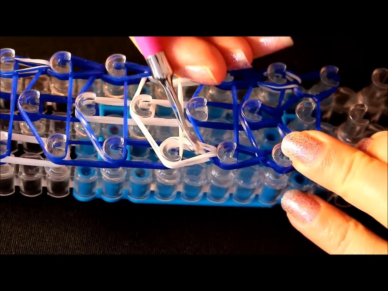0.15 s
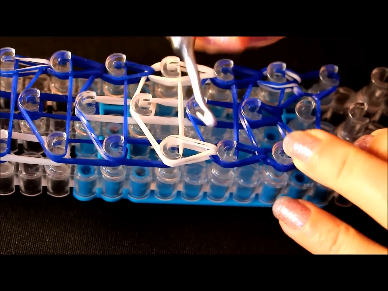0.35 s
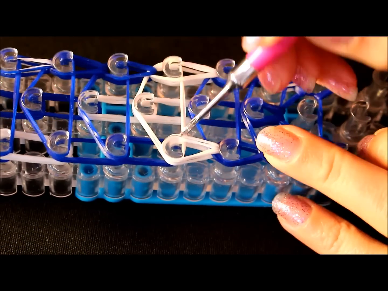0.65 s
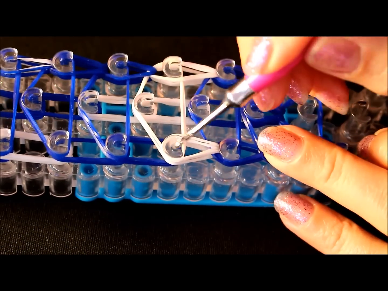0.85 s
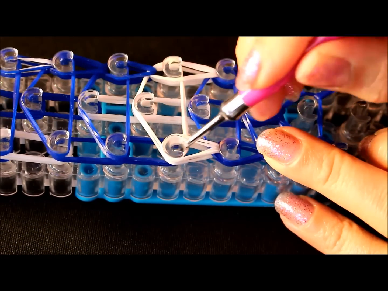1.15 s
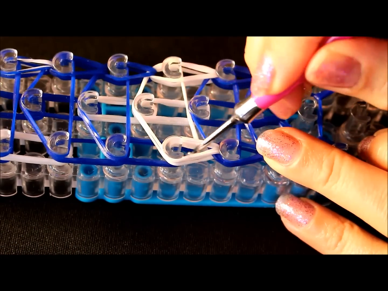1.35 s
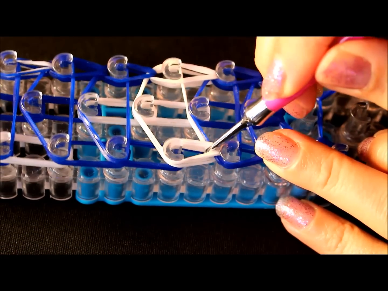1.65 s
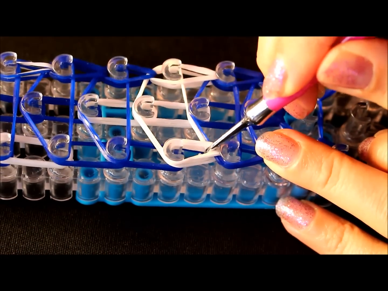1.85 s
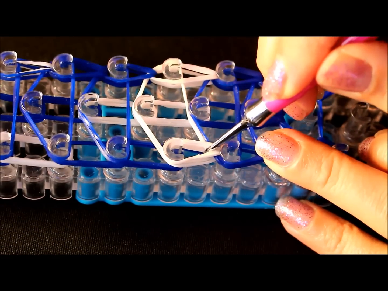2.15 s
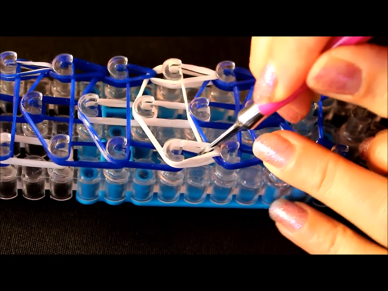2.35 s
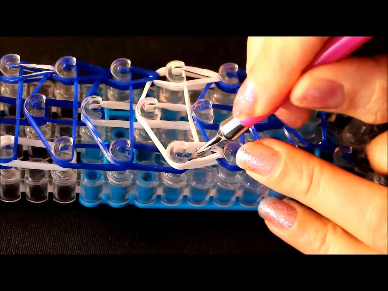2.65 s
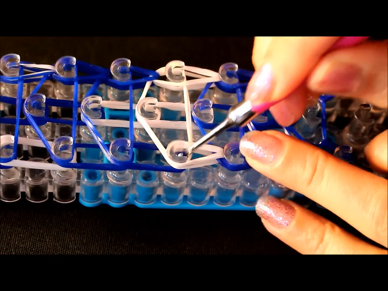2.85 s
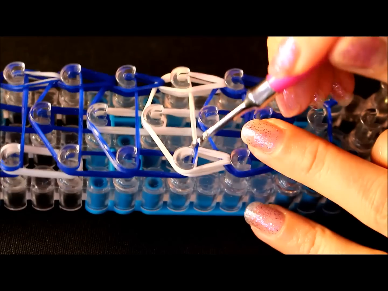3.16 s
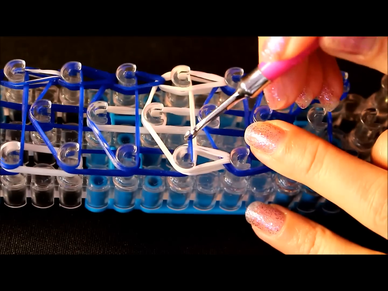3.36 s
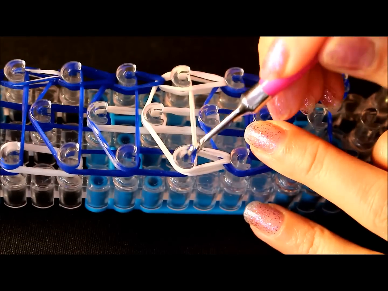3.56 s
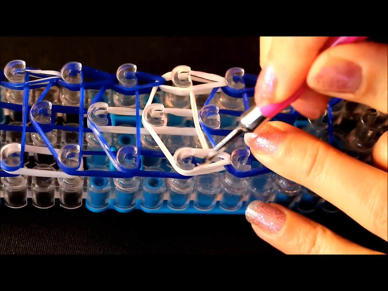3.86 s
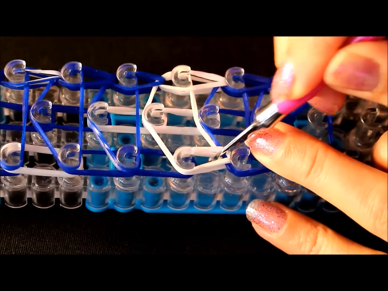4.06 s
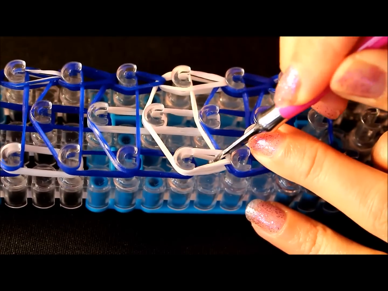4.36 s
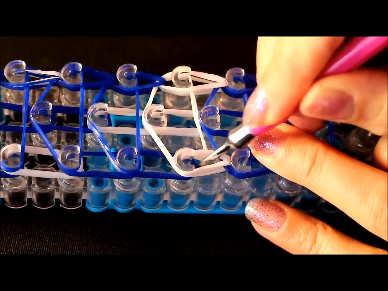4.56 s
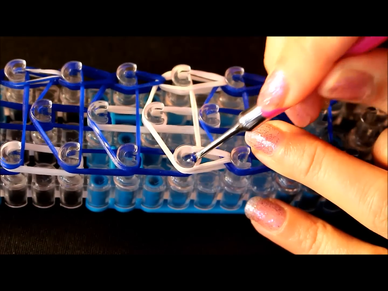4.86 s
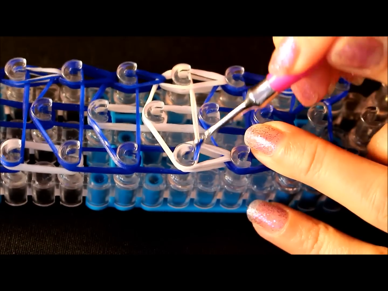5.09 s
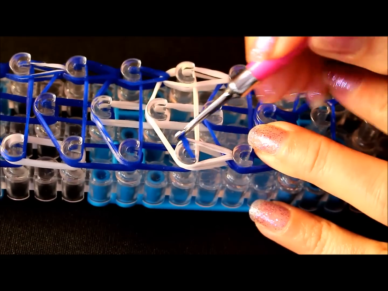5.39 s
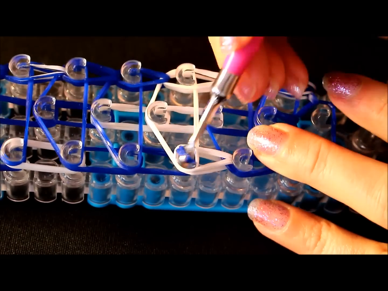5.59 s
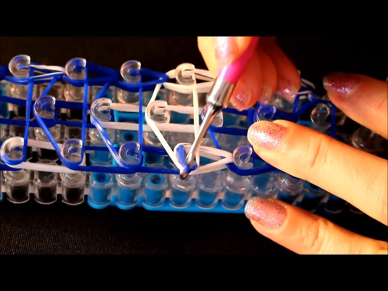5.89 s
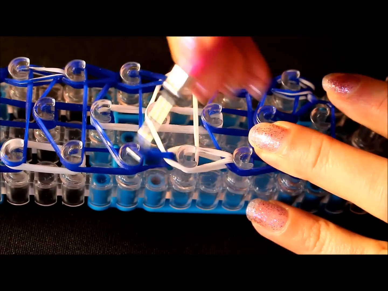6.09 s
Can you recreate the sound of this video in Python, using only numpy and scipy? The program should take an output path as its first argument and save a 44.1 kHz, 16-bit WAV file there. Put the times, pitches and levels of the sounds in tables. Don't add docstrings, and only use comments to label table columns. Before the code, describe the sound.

A steel hook taps and clicks on a plastic loom, rubber bands snapping hard twice, with soft rubbing and faint hiss indoors.

```python
import sys
import numpy as np
from scipy import signal
from scipy.fft import rfft, irfft
from scipy.io import wavfile
from scipy.ndimage import uniform_filter1d

SR = 44100
rng = np.random.default_rng(int(sys.argv[2]) if len(sys.argv) > 2 else 0)


def gain_from_decibels(decibels):
    exponent = np.asarray(decibels, float) / 20
    return 10 ** exponent


def store_wav(level_fs):
    pcm = np.round(np.clip(np.atleast_2d(level_fs), -1, 1) * 32767)
    wavfile.write(sys.argv[1], SR, pcm.T.astype(np.int16))


N = 274743
T = np.arange(N) / SR
SIDES = np.array([[1], [-1]])


def level(x, rms_db):
    return x * gain_from_decibels(rms_db) / np.sqrt(np.mean(x ** 2))


def add(track, start_s, sound):
    i = int(start_s * SR)
    track[i:i + len(sound)] += sound[:N - i]


def decay(t, t60_s):
    return np.exp(-np.log(1000) * t / t60_s)


def shaped(points, size=N):
    top_hz = 15780
    hz, db = np.transpose(points)
    f = np.maximum(np.arange(size // 2 + 1) * SR / size, 1)
    gain = gain_from_decibels(np.interp(np.log(f), np.log(hz), db)) * (f < top_hz)
    return irfft(rfft(rng.standard_normal(size)) * gain, size)


def walk(rate_hz):
    k = int(SR / rate_hz)
    return uniform_filter1d(np.repeat(rng.standard_normal(N // k + 1), k), k)[:N]


def ring(hz, t60_s, db, rise_s, size=int(0.12 * SR)):
    t = T[:size]
    lag_s = 0.0021 * np.minimum(1000 / hz, 1.1)[:, None] ** 2
    swell = (1 - np.exp(-t / (rise_s + lag_s))) ** 2
    phase = 2 * np.pi * (hz[:, None] * t + rng.random((len(hz), 1)))
    swing = (gain_from_decibels(db) / t60_s)[:, None]
    modes = swing * swell * decay(t, t60_s[:, None]) * np.sin(phase)
    return modes.sum(axis=0) / np.sqrt(np.sum(modes.max(axis=1) ** 2))


def blow(hz, t60_s, db, rise_s, crack_db=0):
    crack_fade_db, crack_t60_s = -4.5, 0.014
    rattle_db, rattle_t60_s = -16.5, 0.074
    modes = 1.027 * ring(hz, t60_s, db, rise_s)
    t = T[:len(modes)]
    even_db = uniform_filter1d(db, size=3)
    low_end, high_end = (hz[0] / 2, db[0] - 5.5), (hz[-1] * 0.95, db[-1] - 9)
    crack = level(shaped([low_end] + list(zip(hz, even_db)) + [high_end], size=len(t)), crack_db)
    swell = (1 - np.exp(-t / (rise_s + 0.00043))) ** 2
    fade = gain_from_decibels(crack_fade_db - 60 * t / crack_t60_s) + gain_from_decibels(rattle_db - 60 * t / rattle_t60_s)
    return modes + crack * swell * fade


# pitch_hz, level_db [rms]
HUM_PARTIALS = [(48.4, -68), (96.9, -65.5), (150.7, -70), (199.2, -71), (231.5, -80), (398.4, -80)]


def hum():
    mono = np.zeros(N)
    for pitch_hz, level_db in HUM_PARTIALS:
        wavering_db = level_db + 2.5 + 2.5 * walk(7.2)
        wavering_hz = pitch_hz * (1 + 0.01824 * walk(7.2))
        mono += gain_from_decibels(wavering_db) * np.sin(2 * np.pi * np.cumsum(wavering_hz) / SR)
    return mono * (1 + 0.033 * SIDES)


# freq_hz, density_db [per Hz]
HISS_MID_SPECTRUM = [(15, -38), (25, -21), (53, -4), (199, -3.5), (342, -7.5), (413, -5.5), (670, -8.5),
                     (977, -10.5), (1250, -11), (1680, -12), (3970, -14), (12000, -23.5), (15700, -29.5)]
# freq_hz, density_db [per Hz]
HISS_SIDE_SPECTRUM = [(15, -34), (25, -21), (91, -3.5), (210, -2.5), (370, -3.5), (670, -5.5), (831, -7),
                      (1390, -8.5), (5790, -16.5), (12000, -25.5), (15700, -31.5)]


def hiss():
    mid = level(shaped(HISS_MID_SPECTRUM), -59)
    side = level(shaped(HISS_SIDE_SPECTRUM), -55.5)
    return mid + SIDES * side


# centre_hz, t60_s, level_db
ROOM_BANDS = [(341, 0.33, -18.5), (1030, 0.27, -14), (3650, 0.24, -18.5), (9000, 0.16, -10.5)]


def room(x):
    gap_s, shared = 0.0046, 0.73
    t, tail = T[:SR // 3], 0
    for hz, t60_s, db in ROOM_BANDS:
        points = [(hz / 4, -30), (hz / 1.82, 0), (hz * 1.67, 0), (hz * 4, -30)]
        both, left, right = (level(shaped(points, size=len(t)), db) for _ in range(3))
        band = shared * both + np.sqrt(1 - shared ** 2) * np.array([left, right])
        tail = tail + band * decay(t, t60_s) / np.sqrt(t60_s * SR / 14)
    onset = np.clip(t / gap_s, 0, 1) ** 2
    return signal.fftconvolve(x[None], tail * onset, axes=1)[:, :N]


# time_s, pressure_db
RUB_PRESSURE = [(0.0, -2), (0.74, -3.5), (1.39, -4), (1.56, 2), (1.81, -3), (2.0, -4.5), (2.25, -2),
                (2.81, 3.5), (2.96, -0.5), (3.27, 0), (3.52, -6.5), (4.45, -0.5), (4.62, 5.5), (4.96, -6),
                (5.18, -0.5), (5.42, 4), (5.8, 0.5), (6.1, 0.5)]
# centre_s, length_s, extra_db
HOOK_DRAGS = [
    (2.657, .08, -1),
    (2.946, 0.13, 10.5),
    (3.03, 0.055, 13),
    (4.647, 0.078, 1.5),
    (5.25, 0.13, 10),
    (6.156, 0.16, 20.5),
]
PRESSURE_SLOPES = (2.03, 1.52, 1.96)
DRAG_PER_BODY = (.05, 0.45, 1.2)


def rubbing():
    grains_per_s, grain_scatter_db = 900, 1.6
    tilt_db_per_octave = 3.5
    body_db = (-70.5, -75.5, -87.5)
    pressure_db = np.interp(T, *np.transpose(RUB_PRESSURE))
    drag_db = sum(db * np.exp(-((T - s) / length_s * 2) ** 4) for s, length_s, db in HOOK_DRAGS)
    out = np.zeros(N)
    bodies = TABLE_MODES, [m[:3] for m in BASE_MODES[2:]], [m[:3] for m in PEGS_MODES[1:]]
    for body, slope, db, share in zip(bodies, PRESSURE_SLOPES, body_db, DRAG_PER_BODY):
        hz, t60_s, mode_db = np.transpose(body)
        hits = rng.random(N) < grains_per_s / SR
        grains = hits * rng.standard_normal(N) * gain_from_decibels(grain_scatter_db * rng.exponential(size=N))
        damped = ring(hz, 0.33 * t60_s, mode_db + tilt_db_per_octave * np.log2(hz), 0.00005)
        sound = signal.fftconvolve(grains, damped)[:N]
        out += sound * gain_from_decibels(db + slope * pressure_db + share * drag_db) / np.median(np.abs(sound))
    return out


# pitch_hz, t60_s, level_db
TABLE_MODES = [(127, 0.27, -3.5), (151.8, 0.3, -4.5), (195.5, 0.15, -4.5), (226, 0.21, -15),
               (283, 0.055, -1), (400, 0.06, -7.5)]
# start_s, peak_db, tilt_db [per octave, higher is brighter]
TABLE_THUDS = [(0.695, -41.5, -8.5), (1.097, -49.5, -7), (1.477, -36.5, 6), (1.652, -44.5, -9),
               (1.676, -39, -10.5), (1.703, -39.5, -12), (1.818, -44.5, -7), (2.289, -47, -5),
               (2.33, -49, -3), (2.41, -50, -9), (3.72, -49.5, -7), (3.861, -48, -3), (2.37, -44.5, -7),
               (2.588, -39.5, -2), (2.643, -40.5, 8), (2.785, -36, -1), (3.064, -36.5, -10.5),
               (3.108, -41.5, -35), (4.096, -40, -6), (4.456, -45.5, 2), (4.495, -41, -2),
               (4.549, -31.5, 1.5), (4.602, -58, 11), (4.792, -49, -4), (6.138, -41, -2)]


def thuds():
    hz, t60_s, mode_db = np.transpose(TABLE_MODES)
    out = np.zeros(N)
    for start_s, peak_db, tilt_db in TABLE_THUDS:
        colour_db = mode_db + tilt_db * np.log2(hz / 200) + 0.73 * rng.standard_normal(len(hz))
        add(out, start_s, gain_from_decibels(peak_db - 2.5) * ring(hz, t60_s, colour_db, 0.0001, size=SR // 3))
    return out


# start_s, pitch_hz, peak_db, t60_s
BAND_TWANGS = [
    (.635, 400, -50.5, 0.22),
    (2.514, 631, -40.5, 0.19),
    (4.105, 555, -56, 0.2),
    (6.135, 644, -47, 0.15),
]


def twangs():
    out, t = np.zeros(N), T[:SR // 3]
    for start_s, pitch_hz, peak_db, t60_s in BAND_TWANGS:
        envelope = (1 - np.exp(-t / 0.0016)) * decay(t, t60_s)
        gain = gain_from_decibels(peak_db + 3.6 * walk(46)[:len(t)])
        add(out, start_s, gain * envelope * np.sin(2 * np.pi * pitch_hz * t))
    return out


# pitch_hz, t60_s, height_db
SLIP_PEG_MODES = [(2250, 0.026, -9), (3500, 0.011, -6), (3553, 0.0084, -2), (3880, 0.0054, 2),
                  (4070, 0.0093, -9), (4450, .008, -17), (5200, .004, -11.5), (5560, 0.0085, -13.5),
                  (6450, 0.004, -23), (7640, .004, -28)]
# start_s, peak_db
SLIP_NOTCHES = [(5.561, -48), (5.568, -46), (5.583, -40), (5.594, -44), (5.9332, -39), (6.0205, -29.5),
                (6.1001, -30), (6.1182, -25.5), (6.1358, -25), (6.155, -23.5), (6.169, -27.5),
                (6.182, -29.5), (6.197, -32.5), (6.209, -30), (6.226, -41.5)]


def slipping():
    hz, t60_s, height_db = np.transpose(SLIP_PEG_MODES)
    click, out = ring(hz, t60_s, height_db, 0.00032), np.zeros(N)
    for start_s, peak_db in SLIP_NOTCHES:
        fresh = 0.16 * blow(hz, t60_s, height_db, 0.00051)
        add(out, start_s, gain_from_decibels(peak_db - 1.5) * (click + fresh))
    return out


# pitch_hz, t60_s, tap_db, snap1_db, snap2_db, snap3_db
BASE_MODES = [(287, 0.045, -8, -13.5, -7, 4.5), (388, 0.061, 25, -11, -30, -16),
              (555, 0.073, 7, -18, -2, -6), (653, 0.05, 4, -20, -11.5, -31),
              (905, 0.022, 15.5, -11.5, -14, 7.5), (1020, 0.02, -16, -32, 1, -14),
              (1152, 0.038, 8, -8, -12.5, 0), (1264, 0.065, 4.5, -16, -18, 6), (1496, 0.042, 2, -19, -4, 1),
              (1704, 0.021, -1, -22, -6, -25)]
RAILS_MODES = [(1996, 0.012, -12, -5, -43, -14), (2283, 0.025, 18.5, -5, 4, 1.5),
               (2380, 0.0066, -11, -7, -3, -5), (2760, 0.028, 9.5, -11, -6, -3),
               (2870, 0.063, -13, -33, -8, -6)]
PEGS_MODES = [(3260, 0.011, 6, -4.5, 8, -6), (3425, 0.017, 11, -11, 7.5, -22),
              (3650, 0.01, 5.5, -3, -4, -22), (3770, 0.012, 8.5, -1, 1, -18),
              (4025, 0.024, -18, 2.5, -3.5, -1), (3960, 0.0043, 10.5, 3, -21, -0.5),
              (4120, 0.0081, -0.5, -2, -9, 1.5), (4540, 0.013, 1, -29, -6, -20)]
HOOK_MODES = [(5380, 0.0053, -21, -21, -12.5, -38), (5420, 0.015, 12, -20, -24, -12),
              (6260, 0.0045, -11, -21, -23, -9.5), (7400, 0.0061, 2, -29, -16, -31),
              (8900, 0.0017, -18, -36, -26, -31), (12500, 0.004, -26, -34, -23, -43),
              (13800, .008, -25, -41, -18.5, -52)]
LOOM_MODES = BASE_MODES + RAILS_MODES + PEGS_MODES + HOOK_MODES
# start_s, peak_db, rise_s [contact build-up]
HARD_SNAPS = [
    (1.475, -12, 0.00056),
    (4.089, -10.5, 0.00032),
    (4.5478, -19, 0.00015),
]


def snaps():
    hz, t60_s, _, *snap_db = np.transpose(LOOM_MODES)
    out = np.zeros(N)
    for (start_s, peak_db, rise_s), colour_db in zip(HARD_SNAPS, snap_db):
        add(out, start_s, gain_from_decibels(peak_db + 1.5) * blow(hz, t60_s, colour_db, rise_s, crack_db=-3))
    return out


# start_s, peak_db, depth_db [base over pegs]
TIP_TAPS = [(0.1047, -37, -19), (0.367, -36, -35), (0.79, -38, 5), (1.095, -34, -2), (1.408, -38, -22),
            (1.451, -42, -22), (2.9, -37.5, -22), (2.952, -40, -10), (3.228, -36, -5), (3.759, -44, -19),
            (3.905, -42.5, -14), (4.5411, -34, 1), (4.889, -39.5, 0)]
RAIL_CATCHES = [(0.127, -24.5, -13), (0.235, -39, 13.5), (0.315, -37.5, 1), (1.675, -38.5, 13),
                (1.7, -38, 16), (1.818, -46, 3), (2.374, -49, 6), (2.523, -27, -31), (2.587, -28, 15),
                (2.785, -32, 7), (4.454, -52, -13), (5.462, -43.5, -4)]
LOW_KNOCKS = [(0.696, -30.5, 4.8), (2.512, -34, 10), (2.614, -31.5, 1), (2.637, -30.5, 28), (2.823, -44, 1),
              (2.985, -45, 8), (3.025, -34, 19), (3.719, -51, 4), (4.361, -44.5, 18), (4.573, -51, 15),
              (4.626, -37, 19), (4.695, -40.5, 13), (4.924, -42, 4.2), (5.258, -36, 12), (5.346, -43, 6.9),
              (6.143, -31, 4), (6.153, -39, 30), (6.172, -41, 15), (6.19, -43, 20)]
STEEL_CLICKS = [
    (2.542, -39, 8),
    (2.874, -41.5, -12),
    (5.22, -34.5, -11),
    (5.603, -23, -2),
]
RAILS_OVER_PEGS_DB = (-3.5, 4.5, -5, -8.5)
HOOK_OVER_PEGS_DB = (-6.5, -11, -7, -0.5)
T60_SHARE = (0.99, 1.14, 1.13, 0.52)
PART_BORDERS_HZ = [1900, 3000, 4800]


def taps():
    lag_s = 0.0007
    scatter_db, rails_per_depth = 2, 0.25
    hz, t60_s, tap_db = np.transpose(LOOM_MODES)[:3]
    part, out = np.digitize(hz, PART_BORDERS_HZ), np.zeros(N)
    kinds = TIP_TAPS, RAIL_CATCHES, LOW_KNOCKS, STEEL_CLICKS
    for hits, rails_db, hook_db, share in zip(kinds, RAILS_OVER_PEGS_DB, HOOK_OVER_PEGS_DB, T60_SHARE):
        for start_s, peak_db, depth_db in hits:
            place = rng.standard_normal((2, len(hz)))
            parts_db = np.array([depth_db, rails_db + rails_per_depth * depth_db, 0, hook_db])
            colour_db = tap_db + parts_db[part] + scatter_db * place[0] - 30 * (hz < 600)
            sound = blow(hz * (1 + 0.012 * place[1]), share * t60_s, colour_db, 0.000067)
            add(out, start_s + lag_s, gain_from_decibels(peak_db - 6.5) * sound)
    return out


def scene():
    near = rubbing() + thuds() + twangs() + slipping() + snaps() + taps()
    return near * gain_from_decibels(0.3 * SIDES) + room(near) + hum() + hiss()


def roll_off(x):
    return signal.sosfilt(signal.butter(12, 16690, fs=SR, output="sos"), x)


def record(dry):
    bass_cut = signal.butter(2, 30.0, "high", fs=SR, output="sos")
    finished = signal.sosfilt(bass_cut, dry)
    return roll_off(finished)


dry = scene()
out = record(dry)
store_wav(out)
```